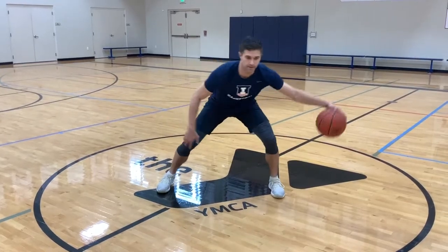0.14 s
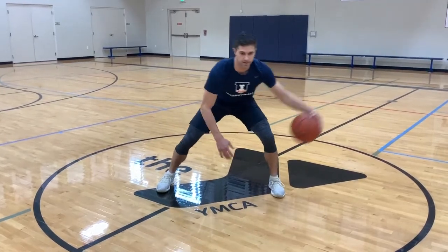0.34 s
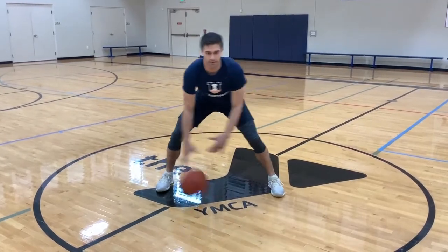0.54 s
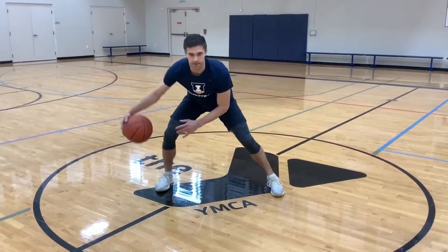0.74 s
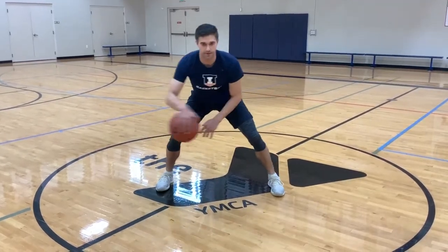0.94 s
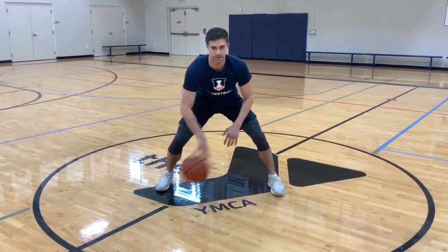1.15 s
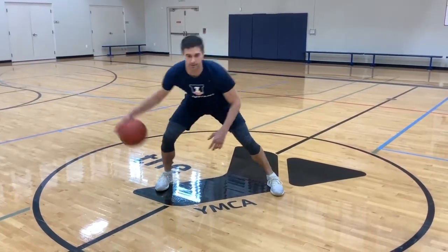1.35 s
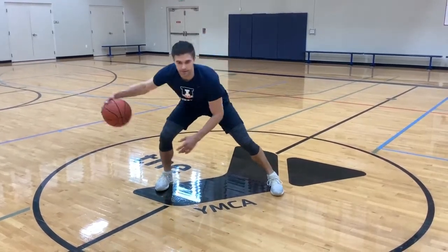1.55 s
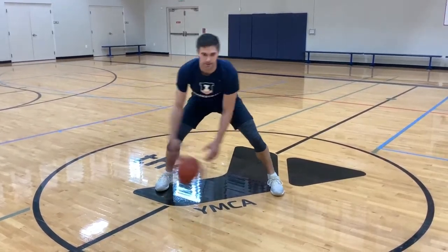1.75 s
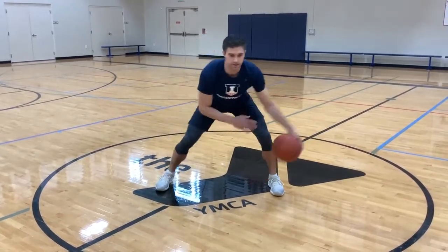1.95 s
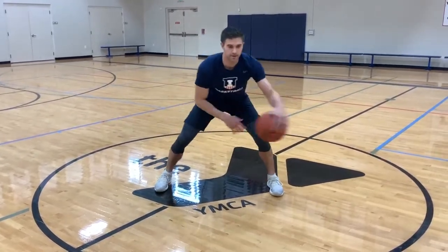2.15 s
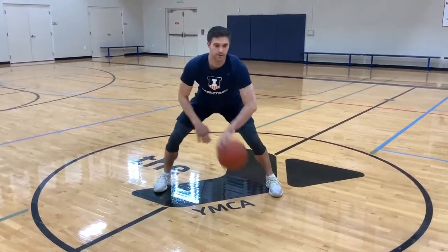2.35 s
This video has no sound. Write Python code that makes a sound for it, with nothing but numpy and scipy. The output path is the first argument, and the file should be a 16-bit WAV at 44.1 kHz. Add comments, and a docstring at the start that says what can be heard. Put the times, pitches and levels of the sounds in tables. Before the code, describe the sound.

Evenly spaced low dribbles of a basketball, about one every 0.6 seconds, boom on hardwood with quick wall echoes and a long tail; one faint hand touch, soft air rumble, microphone clipping on the hits.

```python
"""Basketball dribbled in an empty gym

Low bounces on a sprung hardwood floor: each is a leather slap (shaped noise), a short ring of the air
in the ball (decaying sines) and a floor thump that falls in pitch (knock, then boom). Ceiling and walls
return discrete echoes, scattered treble and a long noise tail, over the band-noise rumble of ventilation.
One soft touch of the hand is heard. A wide microphone pair overloads: peaks duck the level, then clip."""
import sys
import numpy as np
from scipy import signal
from scipy.fft import rfft, irfft
from scipy.io import wavfile

SR = 44100
rng = np.random.default_rng(int(sys.argv[2]) if len(sys.argv) > 2 else 0)


def transcribe(signal):
    """Save signal, clipped to [-1, 1], as a 16-bit WAV file at the path in sys.argv[1]."""
    frames = np.atleast_2d(signal).T
    limited = np.clip(frames, -1, 1)
    pcm = np.round(limited * 32767).astype(np.int16)
    wavfile.write(sys.argv[1], SR, pcm)


def natural_amplitude(level_db):
    """Convert a level in decibels to a linear amplitude factor, elementwise."""
    exponent = np.asarray(level_db, float) / 20
    return 10 ** exponent


N = 110250
LEAD = int(1.4 * SR)   # run-in for earlier bounces
T = np.arange(8192) / SR   # time axis of one contact, s
LIFT_S = 0.0103   # contact to lift-off, when the ball peels off the floor
SLAP_LAG_S = 47 / SR   # left hears echoes and fingers later

# spectrum of leather on boards: pitch_hz, relative density_db (per Hz)
SLAP_SPECTRUM = [(500, 1.5), (2000, -0.5), (3400, -5.5), (5600, -1.5), (6600, -5), (8200, -2), (10200, -11),
                 (11000, -11), (16000, -6)]


def at_hz(points, hz):
    """Interpolate a table on a log-frequency axis."""
    p = np.array(points, float)
    return np.interp(np.log(np.maximum(hz, 1)), np.log(p[:, 0]), p[:, 1])


def colour(x, spectrum):
    """Filter by a spectrum table, in the frequency domain."""
    n = x.shape[-1]
    gain = natural_amplitude(at_hz(spectrum, np.fft.rfftfreq(n, 1 / SR)))
    return irfft(rfft(x) * gain, n)


def add(track, start_s, sound):
    """Mix a sound in at a time, cut at the end of the track."""
    i = LEAD + int(start_s * SR)
    if i < track.shape[-1]:
        track[..., i:i + sound.shape[-1]] += sound[..., :track.shape[-1] - i]


def pair(x, lag_s, pan_db=0):
    """Microphone pair: left delayed against right, pan_db louder."""
    left = np.roll(x, int(round(lag_s * SR)))
    return np.array([left * natural_amplitude(pan_db / 2), x * natural_amplitude(-pan_db / 2)])


def swell(peak_s, sharp):
    """Smooth rise to 1 at peak_s, then fall."""
    return (T / peak_s * np.exp(1 - T / peak_s)) ** sharp


def banded(length, shape):
    """Third-octave stereo noise, weighted by shape(hz), with a set left-right likeness."""
    # likeness of the two channels in a diffuse field: pitch_hz, correlation (-1 to 1)
    likeness = [(60, 0.96), (180, 0.95), (550, -0.095), (1650, 0.26), (4970, -0.15), (15000, 0.22)]
    white = rng.standard_normal((2, 2, length))
    out = 0
    edges_hz = 20 * 2 ** np.arange(0, 9.8, 1 / 3)
    for k, (low, high) in enumerate(zip(edges_hz, edges_hz[1:])):
        sos = signal.butter(2, [low, high], "band", fs=SR, output="sos")
        mid, side = signal.sosfilt(sos, white[k % 2])   # neighbouring bands stay independent
        hz = np.sqrt(low * high)
        alike = np.clip(at_hz(likeness, hz), -1, 1)
        stereo = np.sqrt(1 + alike) * mid + np.sqrt(1 - alike) * side * [[1], [-1]]
        out = out + shape(hz) * stereo
    return out


def ventilation():
    """Steady rumble: stereo noise shaped band by band, set to a fixed rms."""
    # ventilation spectrum: pitch_hz, relative density_db (per Hz)
    spectrum = [(20, 2), (35, -9), (60, -16), (150, -2), (400, -7), (1500, -27), (6000, -40.5),
                (10000, -52), (16000, -75)]
    air = banded(LEAD + N, lambda hz: natural_amplitude(at_hz(spectrum, hz)))
    return natural_amplitude(-28.5) * air / air.std()


def gym(mono):
    """Diffuse tail: convolution with noise that fills up, then dies at its own rate in each band."""
    # tail strength: pitch_hz, relative gain_db
    gain = [(40, -4), (100, -4.5), (170, -3.5), (240, -4), (330, -4.5), (430, -1), (700, -1), (1300, -2),
            (2500, -2), (4500, 4), (8000, 3), (12000, 3), (16000, -8)]
    # reverberation time: pitch_hz, t60_s
    decay = [(60, 2.63), (120, 1.3), (250, 2.28), (500, 2.48), (1300, 4.95), (3000, 3.7), (6000, 0.98),
             (10000, 0.75), (15000, 0.14)]
    # time until the tail is full: pitch_hz, fill_s
    fill = [(100, 0.097), (500, 0.066), (2000, 0.075), (8000, 0.19)]
    tail_db, patchy_db, patch_s = 11.5, 0.5, 0.0557
    t = np.arange(int(2.6 * SR)) / SR
    knots_s = np.arange(0, 3, patch_s)

    def shape(hz):
        # each band swells and sinks on its own
        patches_db = patchy_db * np.interp(t, knots_s, rng.standard_normal(len(knots_s)))
        level_db = at_hz(gain, hz) - 60 * t / at_hz(decay, hz) + patches_db
        return natural_amplitude(level_db) * np.clip(t / at_hz(fill, hz), 0, 1) ** 0.72

    response = banded(len(t), shape) / np.sqrt(SR)
    return natural_amplitude(tail_db) * signal.fftconvolve(mono[None], response, axes=1)[:, :len(mono)]


def wash():
    """Dense scattered treble that trails the wall echo: independent noise per channel, dying fast."""
    # scatter spectrum: pitch_hz, relative density_db (per Hz)
    spectrum = [(2500, -18), (4500, 2.5), (7000, -8.5), (11000, -12.5), (16000, -10.5)]
    start_db, t60_s = -29.5, 0.43
    noise = colour(rng.standard_normal((2, len(T))), spectrum)
    return noise / noise.std() * natural_amplitude(start_db - 60 * T / t60_s)


def echoes(out, start_s, crack, ringing, floor_thump, wall_db):
    """Discrete reflections off ceiling, then walls: delayed, panned copies of a bounce."""
    # arrival after the bounce: delay_s
    delays = [.0338, .0385, .0725, .0795, .088, .112, .151]
    # strength of each arrival: level_db, left_minus_right_db
    levels = [(-13, 6), (-26, -8), (-9, 4.5), (-11, -7), (-20, -7), (-15, 5), (-18, 1)]
    # colour of the echoed slap: pitch_hz, gain_db
    dull = [(1500, -8), (4500, 2), (7000, 0), (10000, -3), (16000, -9)]
    bass_db, ring_db, varies_db = -3.5, -7, 3
    wall_after_s = .05   # later echoes come off the walls
    mix = colour(crack, dull) + natural_amplitude(ring_db) * ringing + natural_amplitude(bass_db) * floor_thump
    for delay_s, (level_db, pan_db) in zip(delays, levels):
        level_db = level_db + wall_db * (delay_s > wall_after_s) + varies_db * rng.standard_normal()
        add(out, start_s + delay_s, natural_amplitude(level_db) * pair(mix, SLAP_LAG_S, pan_db))


def fingers(out):
    """The hand meets the ball: a faint slap with dulled treble, almost no lift-off or hiss."""
    # touches of the hand: start_s, level_db
    touches = [(1.142, -33)]
    for start_s, level_db in touches:
        touch = colour(slap(-75, -64), [(9000, 0), (16000, -14)])
        add(out, start_s, natural_amplitude(level_db) * pair(touch, SLAP_LAG_S))


def thump(knock_db, knock_hz, boom_db, boom_hz):
    """Bending waves of the sprung floor: the higher knock first, then the boom, ringing on lower."""
    knock_peak_s, knock_sharp = .008, 8
    board_hz, board_db, board_peak_s, board_sharp = 437.3, -13.5, 0.012, 12.2
    boom_peak_s, boom_sharp = .0122, 8
    after_hz, after_db, after_t60_s = 106, -9, .12
    knock = swell(knock_peak_s, knock_sharp) * np.cos(2 * np.pi * knock_hz * (T - knock_peak_s))
    # single boards rattle above the knock
    rattle = np.cos(2 * np.pi * (board_hz * T + rng.random()))
    board = natural_amplitude(board_db) * swell(board_peak_s, board_sharp) * rattle
    late = T - boom_peak_s
    boom = swell(boom_peak_s, boom_sharp) * np.cos(2 * np.pi * boom_hz * late)
    fade = natural_amplitude(after_db - 60 * late / after_t60_s) * np.clip(late / boom_peak_s, 0, 1)
    after = fade * np.cos(2 * np.pi * after_hz * late)
    return natural_amplitude(knock_db) * knock + natural_amplitude(boom_db) * (board - boom - after)


def modes_ring(modes, favour_hz, damped):
    """Small scattered pushes set the modes ringing, at contact and again at lift-off."""
    favour_db_per_oct2 = 36   # modes away from the favoured pitch are weaker
    push_spread_s, again_db = .0008, -8
    out = 0
    for hz, mode_db, t60_s in modes:
        mode_db = mode_db - favour_db_per_oct2 * np.log2(hz / favour_hz) ** 2
        for start_s, push_db in ((0, 0), (LIFT_S, again_db)):
            t = np.maximum(T - start_s - push_spread_s * rng.random(), 0)
            level_db = mode_db + push_db + rng.normal(0, 1.5) - 60 * t / (t60_s * damped)
            out = out + natural_amplitude(level_db) * np.sin(2 * np.pi * hz * t) * (1 - np.exp(-t * hz))
    return out / 2


def ring(low_db, low_favour_hz, high_db, high_favour_hz, damped=1):
    """Air in the ball: a low and a high group of modes; damped scales every t60."""
    # lower air modes: pitch_hz, relative level_db, undamped t60_s
    low_modes = [(870, -7, .03), (1022, 0, .035), (1090, -5, .02), (1352, 1, .03), (1480, 0, .02),
                 (1750, -9, .014)]
    # higher air modes: pitch_hz, relative level_db, undamped t60_s
    high_modes = [(1850, -3, .014), (2060, -2, .014), (2240, -6, .014), (2750, -1, .016), (3035, -3, .016)]
    low = natural_amplitude(low_db) * modes_ring(low_modes, low_favour_hz, damped)
    return low + natural_amplitude(high_db) * modes_ring(high_modes, high_favour_hz, damped)


def slap(lift_db, contact_db):
    """Bright noise burst at contact, a second at lift-off, hiss of rolling leather between."""
    rise_s, t60_s = .0005, .011
    noise = colour(rng.standard_normal(len(T)), SLAP_SPECTRUM)

    def burst(t):
        rise = 1 - np.exp(-np.abs(t) / rise_s)
        return (t > 0) * rise * natural_amplitude(-60 * np.abs(t) / t60_s)

    rolling = np.clip(T / rise_s, 0, 1) * natural_amplitude(contact_db - 60 * np.maximum(T - LIFT_S, 0) / t60_s)
    envelope = 2 * burst(T) + 2 * natural_amplitude(lift_db) * burst(T - LIFT_S) + rolling
    return noise / noise.std() * envelope


def to_room(slap_db, ring_settings, knock_db, boom_db):
    """What the room receives from all sides: a smooth click, a shorter ring, the whole floor."""
    click = colour(1. * (np.arange(len(T)) == 64), SLAP_SPECTRUM)   # the slap summed over all sides
    around = natural_amplitude(-3) * ring(*ring_settings, damped=.4)
    knock_hz, boom_hz = 224, 104   # mean knock; the floor as a whole booms lower
    return natural_amplitude(slap_db + 19) * click + around + thump(knock_db, knock_hz, boom_db, boom_hz)


def bounce(out, mono, floor, skin):
    """One ball contact: direct slap, ring and thump in out with echoes; room feed in mono."""
    start_s, knock_db, knock_hz, boom_db, boom_hz = floor
    slap_db, *ring_settings, wall_db, room_knock_db, slap_lag_s = skin
    ring_lag_s, thump_lag_s, wash_s = 56 / SR, 30 / SR, .073
    leather = natural_amplitude(slap_db) * slap(lift_db=-10, contact_db=-14.5)
    ringing = ring(*ring_settings)
    floor_thump = thump(knock_db, knock_hz, boom_db, boom_hz)
    direct = pair(leather, slap_lag_s, 1.0) + pair(ringing, ring_lag_s) + pair(floor_thump, thump_lag_s)
    add(out, start_s, direct)
    add(mono, start_s, to_room(slap_db, ring_settings, room_knock_db, boom_db))
    add(out, start_s + wash_s, natural_amplitude(wall_db) * wash())
    crack = natural_amplitude(slap_db) * slap(-22, -24)   # only the first crack stands out in echoes
    echoes(out, start_s, crack, ringing, floor_thump, wall_db)


def scene():
    """Bounces and fingers, with tail and ventilation; the run-in is cut off."""
    # ball meets floor: start_s, knock_db, knock_hz, boom_db, boom_hz
    bounces = [(-1.29, -6, 240, -4, 140), (-.66, -6, 240, -4, 140), (-.034, -6, 240, -5, 140),
               (.572, -4, 290, -5, 145), (1.2435, -13, 230, -2, 150), (1.845, -8, 215, -8, 115),
               (2.4795, -13, 310, -1, 150)]
    # brightness of each bounce: slap_db, low_ring_db, low_favour_hz, high_ring_db, high_favour_hz,
    # wall_echo_db, room_knock_db, slap_lag_s (left after right)
    skins = [(-11, -29, 1200, -19, 2800, .1, -7, .00107), (5.5, 9.5, 1400, -29, 3000, .1, -12, .00107),
             (-9, -4, 1320, 4.5, 2340, -2.5, -6, .00107), (-7, -3, 1120, 1, 2190, -0.5, -4, 0.00106),
             (-8, 2, 1260, -5, 1700, -2.5, -8.5, 0.001048), (-11, 1.5, 1390, -19, 6300, -4, -1.5, .00107),
             (-8, -3, 1080, -3.5, 3100, .1, -10, 0.0011)]
    out, mono = np.zeros((2, LEAD + N)), np.zeros(LEAD + N)
    for floor, skin in zip(bounces, skins):
        bounce(out, mono, floor, skin)
    fingers(out)
    return (out + gym(mono) + ventilation())[:, LEAD:]


def top_cut(x):
    """Nothing passes above the cut-off."""
    return signal.sosfilt(signal.butter(12, 16480, fs=SR, output="sos"), x)


def record(dry):
    """Overload: a limiter ducks after each peak, a low-pass follows, what is left over clips."""
    limit_db, release_db_per_s, smooth_s, stop_hz = 4, 400, .002, 16500
    over_db = np.maximum(20 * np.log10(np.abs(dry).max(0) + 1e-9) - limit_db, 0)
    release_db = release_db_per_s * np.arange(N) / SR
    held_db = np.maximum.accumulate(over_db + release_db) - release_db   # peak hold, linear release in dB
    r = np.exp(-1 / (smooth_s * SR))
    x = dry * natural_amplitude(-signal.lfilter([1 - r], [1, -r], held_db))
    x = signal.sosfilt(signal.cheby2(10, 50, stop_hz, fs=SR, output="sos"), x)
    return top_cut(np.clip(x, -1, 1))


dry = scene()
out = record(dry)
transcribe(out)
```